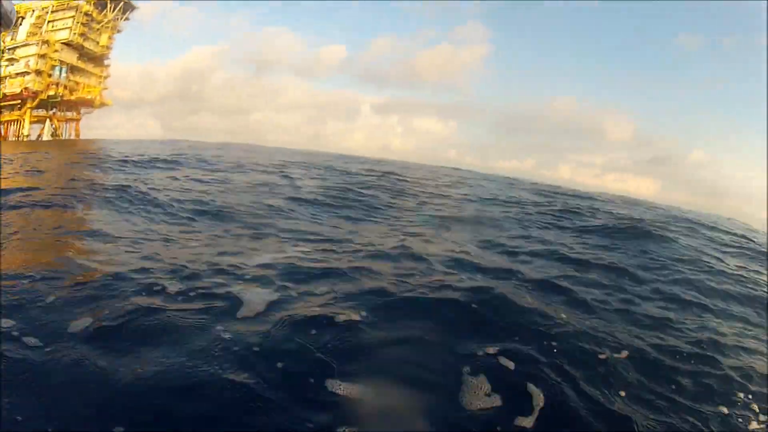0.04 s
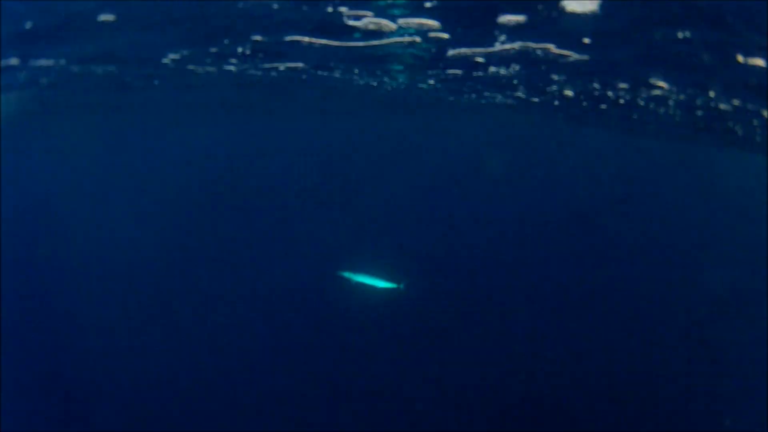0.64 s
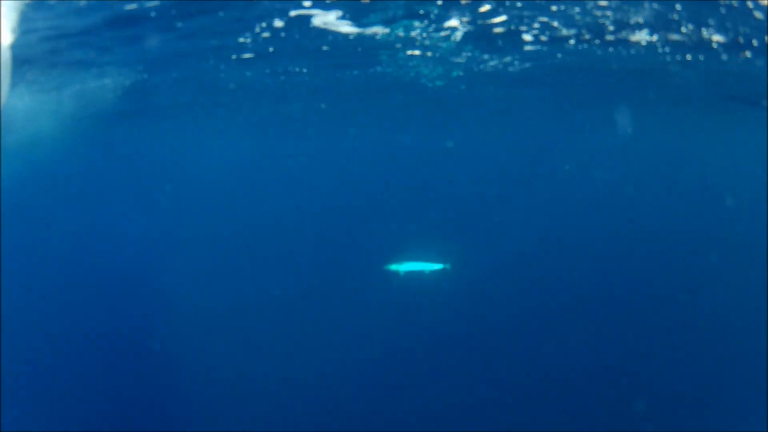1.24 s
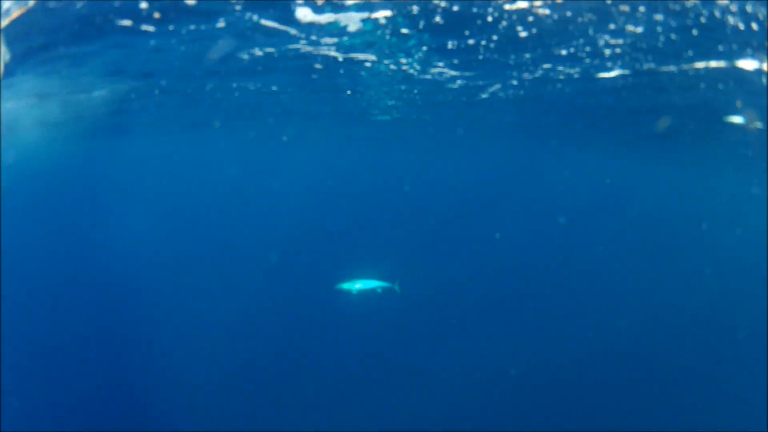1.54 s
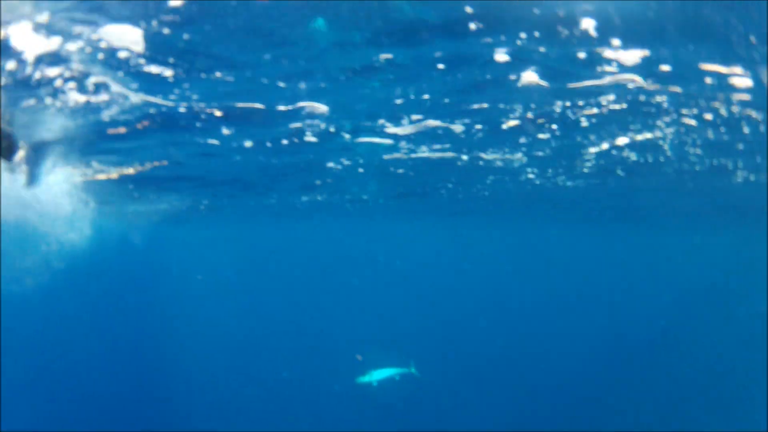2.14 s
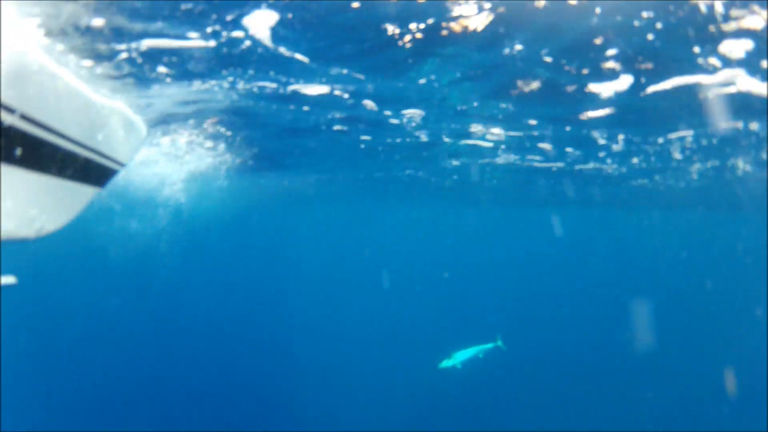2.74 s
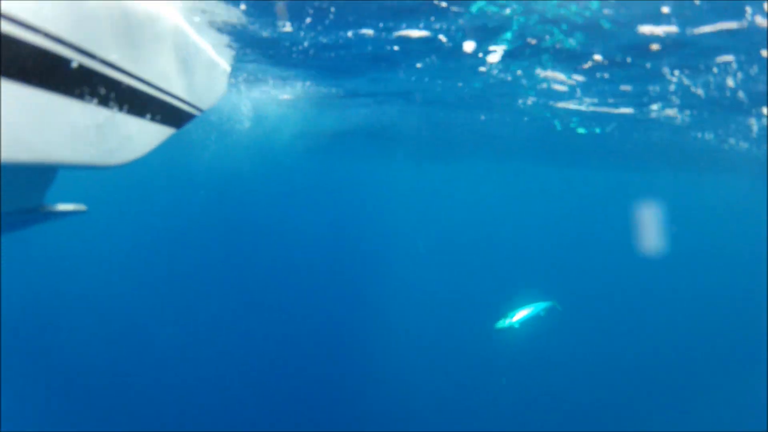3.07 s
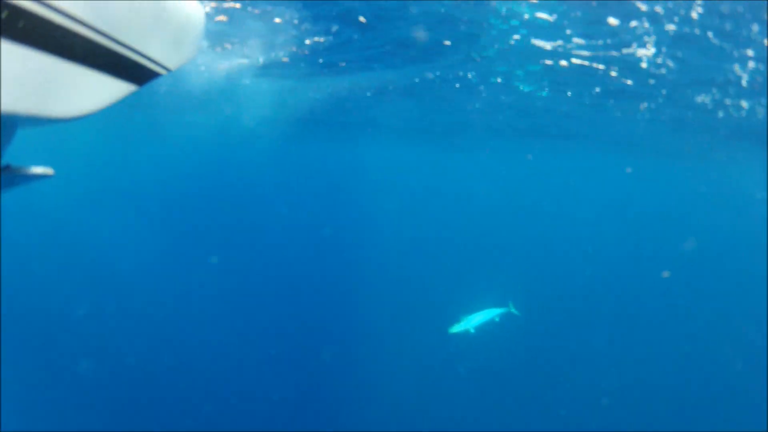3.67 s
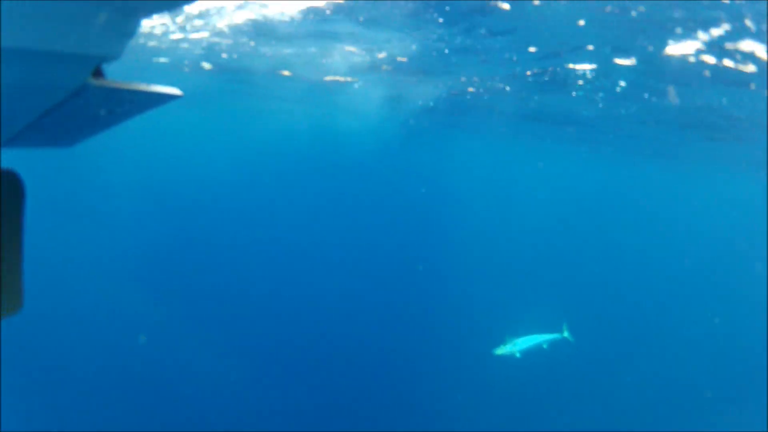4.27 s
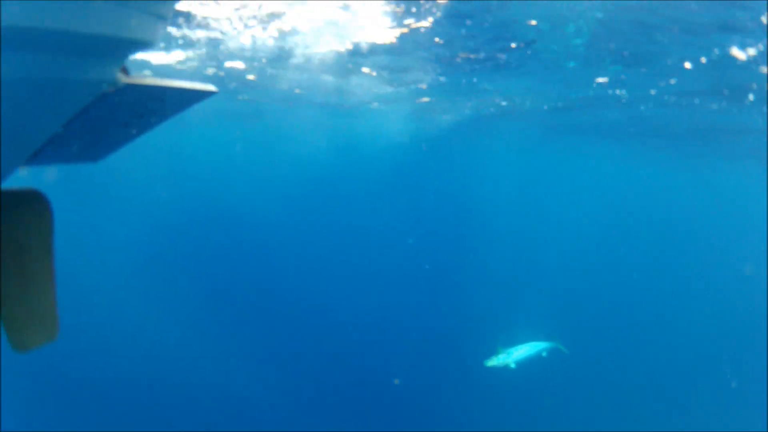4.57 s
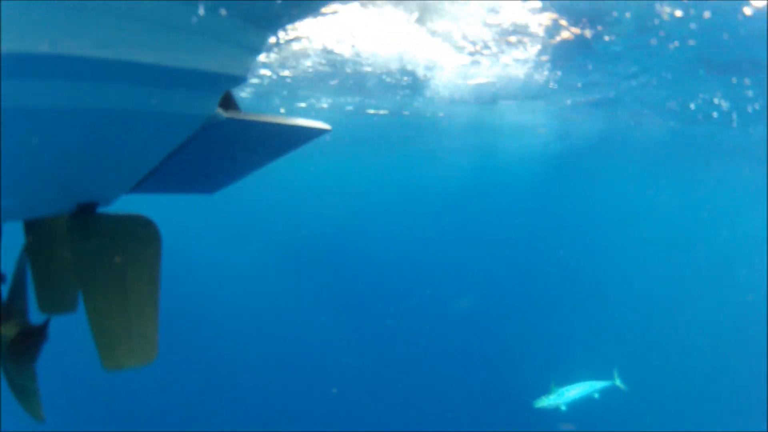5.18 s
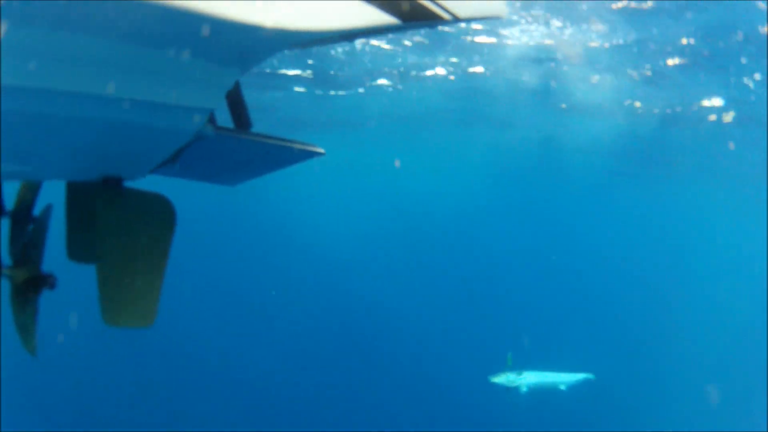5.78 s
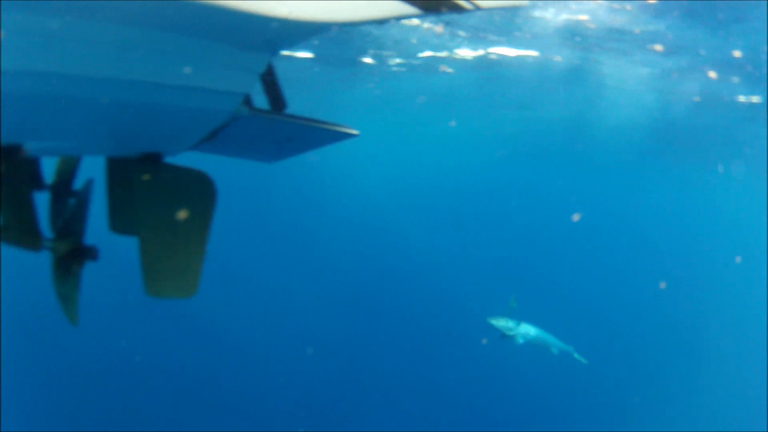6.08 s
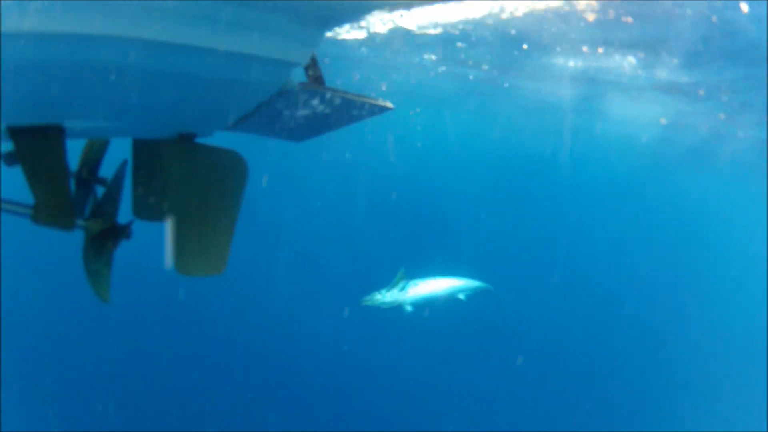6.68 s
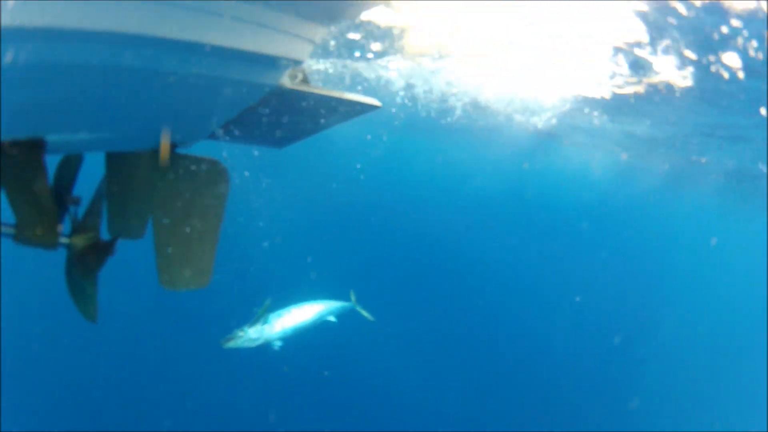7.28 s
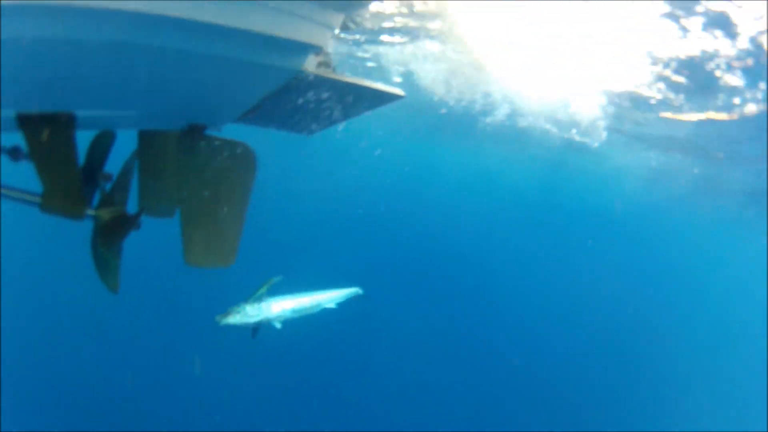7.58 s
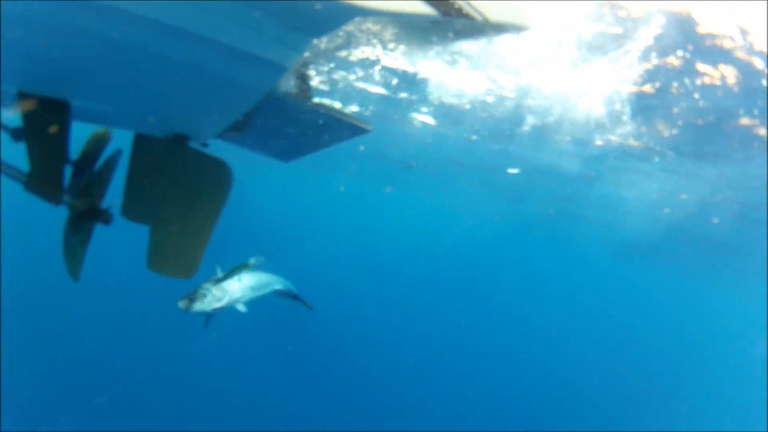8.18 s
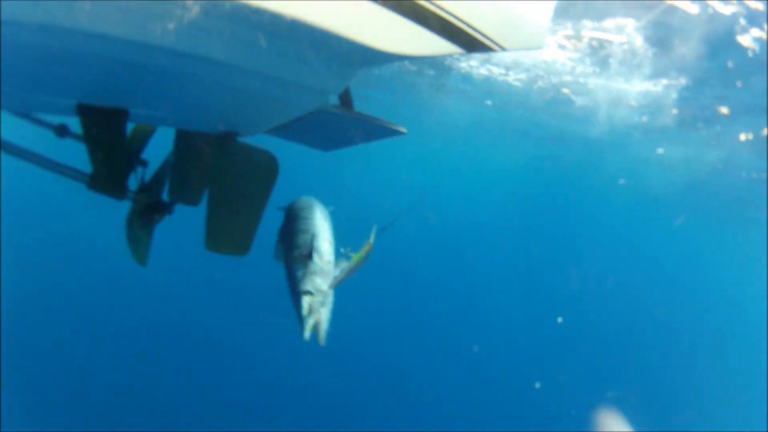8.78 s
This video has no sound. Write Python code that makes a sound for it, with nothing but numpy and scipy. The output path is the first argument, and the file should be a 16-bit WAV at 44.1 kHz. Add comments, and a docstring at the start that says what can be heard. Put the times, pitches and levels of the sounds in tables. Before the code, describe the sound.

A faint boat exhaust mutters in the air, then the microphone plunges into the sea with a sharp splash and a burst of gurgling bubbles. Underwater, two motors throb with a muffled low rumble, a swelling hull drone and a light machinery rattle. Propeller wash churns and fizzes throughout. Close by, bubbles gulp and plink and the waterproof housing ticks, growing busier near the end.

```python
"""In the sea beside a slowly moving fishing boat, heard from a camera housing plunged under the surface.
A faint exhaust mutter in the air gives way to two motors throbbing through the water, with hull drone
and machinery clatter. The propeller wash churns, rushes and fizzes, swelling as the stern comes near.
Up close, air bubbles gulp and plink, spray crackles and the housing ticks.
A coarse converter adds a thin sheen on top."""
import sys
import numpy as np
from scipy import signal
from scipy.fft import rfft, irfft, next_fast_len
from scipy.io import wavfile

SR = 44100
rng = np.random.default_rng(int(sys.argv[2]) if len(sys.argv) > 2 else 0)


def inscribe(sig):
    """Save sig as 16-bit PCM at rate SR to the path in sys.argv[1].

    A 1-D sig is mono; a 2-D sig holds one channel per row.
    Samples are clipped to [-1, 1] before scaling.
    """
    pcm = np.round(np.clip(np.atleast_2d(sig).T, -1, 1) * 32767)
    wavfile.write(sys.argv[1], SR, pcm.astype(np.int16))


N = 397782
TIME = np.arange(N) / SR


def from_db(db):
    """Decibels to gain."""
    return 10 ** (np.asarray(db) / 20)


def unit_rms(x):
    """Scale to rms 1."""
    return x / np.sqrt(np.mean(x ** 2) + 1e-20)


def automation(points):
    """Straight ramps between breakpoints, one value a sample."""
    return np.interp(TIME, *np.transpose(points))


def drift(rate_hz):
    """Slow random modulation, rms 1."""
    pole = np.exp(-80 * np.pi * rate_hz / SR)
    noise = rng.standard_normal(N // 40 + 2002)
    slow = signal.lfilter([1], [1, -2 * pole, pole * pole], noise)[2000:]
    return np.interp(np.arange(N) / 40, np.arange(len(slow)), unit_rms(slow))


def equalise(x, curve):
    """Shape a sound with an EQ curve; rms 1."""
    size = next_fast_len(N)
    hz, db = np.transpose(curve)
    bins_hz = np.maximum(np.arange(size // 2 + 1) * SR / size, 1)
    gain = from_db(np.interp(np.log(bins_hz), np.log(hz), db))
    return unit_rms(irfft(rfft(x, size) * gain, size)[:N])


def band(x, hz, width_hz):
    """Two matching resonators in series, unity gain at the peak."""
    r = np.exp(-np.pi * width_hz / SR)
    b = np.array([1, 0, -1]) * (1 - r * r) / 2
    a = [1, -2 * r * np.cos(2 * np.pi * hz / SR), r * r]
    return signal.lfilter(b, a, signal.lfilter(b, a, x + 1e-18) + 1e-18)


def grains(per_s, spread_db):
    """Random clicks of uneven size; rms 1."""
    sizes = from_db(spread_db * np.minimum(rng.exponential(1, N), 4)) * rng.choice([-1, 1], N)
    return unit_rms(sizes * (rng.random(N) < per_s / SR))


def pulsing(turns, per_turn, sharpness):
    """Smooth tremolo locked to the crankshaft, peaking at 1."""
    return np.exp(sharpness * (np.cos(2 * np.pi * per_turn * turns) - 1))


def knocks(turns, points):
    """A rough pattern that loops with every crankshaft turn."""
    return unit_rms(np.interp(turns % 1, np.arange(points) / points, rng.standard_normal(points)))


def add(out, start_s, sound):
    """Mix a sound in at its cue."""
    at = int(np.clip(round(start_s * SR), 0, N))
    out[at:at + len(sound)] += sound[:N - at]


# Tone of the boat through the air: freq_hz, gain_db
EXHAUST_EQ = [(41, -35), (70, -2.5), (167, -6.5), (414, -37), (674, -24), (775, -33), (906, -21),
              (1400, -41.5), (1760, -21), (2170, -33), (2860, -34), (4500, -34.5), (5850, -55),
              (9900, -120)]

def exhaust(turns, level_db=-49, dip_s=0.22, fade_db_per_s=69):
    """The exhaust mutters through the air and fades as the housing dips towards the surface."""
    mutter = knocks(turns, points=600) + rng.standard_normal(N) * pulsing(turns, 2.2, sharpness=0.28)
    fade = from_db(level_db - fade_db_per_s * np.maximum(TIME - dip_s, 0))
    return fade * equalise(mutter, EXHAUST_EQ)


# Tone of the fizz: freq_hz, gain_db
FIZZ_EQ = [(300, -11.5), (900, 6), (1500, 9.5), (2400, 4.5), (2900, -5), (3500, 1.5), (4300, -9.5),
           (5600, -17.5)]

def fizz(wash_db, plunge_s=0.52, hold_s=1.43, clear_db_per_s=17.5):
    """Fine bubbles crackle on the housing in clumps, fed by the wash and by air the plunge drags down."""
    cleared_db = clear_db_per_s * np.maximum(TIME - plunge_s - hold_s, 0)
    dragged_air = (TIME > plunge_s) * from_db(-54 - cleared_db)
    crackle = grains(per_s=1100, spread_db=3) * from_db(2.2 * drift(25))
    return np.hypot(dragged_air, from_db(wash_db)) * equalise(crackle, FIZZ_EQ)


def wash_layer(turns, eq, sharpness, lumps_db, growl_db):
    """Dense bubbles pulse with the propeller blades over the motor's growl."""
    surge = pulsing(turns, 4, sharpness) * from_db(lumps_db * drift(14))
    bubbling = equalise(grains(per_s=4000, spread_db=2) * surge, eq)
    growl = equalise(knocks(turns, points=400), eq)
    return unit_rms(bubbling + from_db(growl_db) * growl)


# Tone of the low churn and of the hollow rush: freq_hz, gain_db
CHURN_EQ = [(120, -22.5), (205, -5), (275, 3.5), (340, 1), (400, -1.5), (480, -11), (650, -25.5),
            (1200, -53.5)]
RUSH_EQ = [(300, -25.5), (450, -7), (530, -3.5), (585, 3.5), (640, -6), (700, -11), (780, -12), (900, -23),
           (1100, -33.5), (2000, -71.5)]
# Strength of the wash at the housing, around its average: time_s, level_db
WASH_FLOW = [(1.0, 0), (1.95, 2), (2.7, -5), (3.1, -1), (4.1, -0.5), (4.85, 3), (5.4, -1), (6.05, 2.5),
             (6.65, 1), (7.25, 2), (7.58, -3.5), (7.8, -1), (8.3, -1), (8.62, 2.5), (9.02, -1.5)]

def propeller_wash(turns, twin_turns, coupling_db):
    """One flow rides churn, rush and fizz together; each is ducked by its own amount in air."""
    flow_db = automation(WASH_FLOW)
    churn = wash_layer(turns, CHURN_EQ, sharpness=0.49, lumps_db=3.5, growl_db=-4.5)
    churn *= from_db(-36 + 1.17 * flow_db + 1.3 * coupling_db)
    rush = wash_layer(twin_turns, RUSH_EQ, sharpness=0.15, lumps_db=2.06, growl_db=-10)
    rush *= from_db(-34 + flow_db + 1.74 * coupling_db)
    return churn + rush + fizz(wash_db=-58 + 0.8 * flow_db + 0.28 * coupling_db)


def small_bubble(hz, cycles, rise):
    """An air pocket rings as a dying sine whose pitch creeps up."""
    t60 = cycles / hz
    t = np.arange(int(max(t60, 0.005) * 1.2 * SR)) / SR
    envelope = from_db(-60 * t / t60) * (1 - np.exp(-t * hz))
    return envelope * np.sin(2 * np.pi * hz * t * (1 + rise * t / t60))


# Drifting clouds of small bubbles: start_s, end_s, bubble_level_db, burst_level_db
BUBBLE_CLOUDS = [(0.557, 1.095, -23.5, -51), (1.15, 3.399, -33, -42), (3.388, 7.597, -49, -40),
                 (7.651, 9.001, -31.5, -34)]

def bubble_clouds(per_cloud=90, spread_db=10):
    """Small bubbles of all sizes drift past, the smallest highest and faintest."""
    out = np.zeros(N)
    for start, end, db, _ in BUBBLE_CLOUDS:
        for when, smallness, softness in rng.random((per_cloud, 3)):
            gain = from_db(db - spread_db * softness - 11 * smallness)
            plink = small_bubble(hz=800 * 4.3 ** smallness, cycles=46, rise=0.091)
            add(out, start + when * (end - start), gain * plink)
    return out


def cloud_bursts(per_cloud=12, spread_db=10.5, decay_s=0.006, hz=2330):
    """Cues for tiny splashes scattered through each cloud."""
    return [(start + when * (end - start), db - spread_db * softness, decay_s, hz * 2 ** (height - 0.5))
            for start, end, _, db in BUBBLE_CLOUDS
            for when, softness, height in rng.random((per_cloud, 3))]


# Bursts of broken air and spray at the housing: start_s, level_db, decay_s, pitch_hz
SPLASH_CUES = [(0.038, -41.5, 0.0097, 2420), (0.525, -41.5, 0.015, 1990), (0.536, -16, 0.012, 1790),
               (0.552, -2.5, 0.0047, 2450), (0.561, -27, 0.044, 1860), (.632, -18.5, 0.0094, 1550),
               (.665, -28, 0.0078, 1570), (0.691, -18.5, 0.0082, 2550), (0.713, -24, 0.022, 1820),
               (0.858, -28, 0.0059, 2340), (.95, -41, 0.024, 2640), (1.21, -36, 0.026, 2700),
               (1.825, -31, 0.017, 2030), (1.86, -51, 0.068, 3000), (2.405, -29, 0.01, 2000),
               (3.189, -30.5, 0.01, 1450), (4.755, -32, 0.019, 1940), (6.17, -38.5, 0.041, 920),
               (6.996, -27.5, 0.0072, 1550), (7.018, -31, 0.0044, 2170), (7.038, -27.5, 0.0036, 1800),
               (7.702, -28, 0.0047, 2700), (7.733, -30, 0.0058, 2270), (7.9, -33, 0.019, 1060),
               (7.942, -26, 0.0029, 2980), (8.07, -26.5, 0.0042, 1720), (8.145, -32.5, 0.011, 1380),
               (8.473, -25, 0.0045, 1878), (8.495, -30, 0.005, 2964), (8.56, -27.5, 0.0077, 2300),
               (8.719, -37, 0.016, 2430), (8.764, -25, 0.0049, 2170), (8.99, -29, 0.016, 2480)]

def splashes(crackle_db=-8, plink_db=4, attack_s=0.0012, plinks=5):
    """Each slap of water is a dying crackle that sheds a handful of tiny ringing bubbles."""
    out, t = np.zeros(N), TIME[:SR // 3]
    for start, db, decay, hz in list(SPLASH_CUES) + cloud_bursts():
        crackle = unit_rms(band(rng.standard_normal(len(t)), hz, width_hz=1390))
        envelope = np.exp(-t / decay) * (1 - np.exp(-t / attack_s))
        add(out, start, from_db(db + crackle_db) * envelope * crackle)
        for age, detune in rng.uniform([0, -1], [1.5, 1], (plinks, 2)):
            plink = small_bubble(hz * 1.34 ** detune, cycles=18.7, rise=0.023)
            add(out, start + age * decay, from_db(db + plink_db) * np.exp(-age / 2) * plink)
    return out


# Sharp contacts on the housing: start_s, level_db
TICK_CUES = [(0.552, -5), (0.614, -27), (0.6881, -18), (0.764, -32), (2.7489, -10), (4.753, -42),
             (5.32, -35), (6.8109, -40), (7.039, -29), (7.9427, -33), (8.0716, -39), (8.496, -28),
             (8.6418, -38), (8.8961, -36)]
# Ring of the housing: pitch_hz, level_db, t60_s
HOUSING_MODES = [(2010, -2, 0.011), (2530, -14, 0.017), (3630, -4, 0.011), (4090, -8, 0.015),
                 (4710, -7.5, 0.014), (4940, -6.5, 0.013)]

def housing_ticks(trim_db=-3.5, scatter_db=2):
    """Sharp contacts ring the housing briefly, each with its own balance of modes."""
    out, t = np.zeros(N), TIME[:SR // 20]
    hz, mode_db, t60 = np.transpose(HOUSING_MODES)[:, :, None]
    for start, db in TICK_CUES:
        balance_db = mode_db + scatter_db * rng.standard_normal(hz.shape)
        modes = from_db(balance_db - 60 * t / t60) * np.sin(2 * np.pi * hz * t)
        add(out, start, from_db(db + trim_db) * modes.sum(axis=0))
    return out


# Ring of the hull's panels: pitch_hz, width_hz, level_db
HULL_PANELS = [(1208, 85, 2), (1560, 230, -6), (1838, 94, -3.5), (2026, 170, 3), (2211, 86, -1),
               (2442, 330, -10.5), (3450, 370, -18.5), (4840, 250, -49.5)]
# Clatter fader, highest as the stern passes: time_s, level_db
CLATTER_FADER = [(1.15, -55), (2.0, -54.5), (3.2, -50.5), (4.1, -47.5), (4.85, -43.5), (5.45, -48.5),
                 (7.5, -52), (8.6, -47.5)]

def machinery_clatter(turns, looped_db=-6, uneven_db=2.2):
    """Each firing shakes the machinery, and the hull passes the rattle on in narrow bands."""
    contacts = grains(per_s=4600, spread_db=3) + from_db(looped_db) * knocks(turns, points=2800)
    shaking = contacts * pulsing(turns, 2, sharpness=0.44) * from_db(uneven_db * drift(27))
    panels = sum((-1) ** k * from_db(db) * band(shaking, hz, width)
                 for k, (hz, width, db) in enumerate(HULL_PANELS))
    return from_db(automation(CLATTER_FADER)) * unit_rms(panels)


# Hull drone fader: time_s, level_db
DRONE_FADER = [(1.2, -41.5), (2.2, -25), (2.749, -35), (3.05, -29), (3.301, -42), (3.85, -45), (4.7, -27),
               (6.2, -34.5), (6.501, -39), (7.3, -39.5), (7.95, -30.5), (9.02, -40.5)]

def hull_drone(turns, resonance_hz=156.5, half_width_hz=24.7, roughness=0.41, trim_db=-1.5):
    """Uneven cylinders make half orders, which the hull picks out around its resonance."""
    drone = 0
    for order in np.arange(16, 25) / 2:
        nominal_hz = order * 15.6
        gain = 1 / (1 + ((nominal_hz - resonance_hz) / half_width_hz) ** 2)
        flutter = 1 + roughness * drift(6.2)
        drone += gain * flutter * np.sin(2 * np.pi * (order * turns + rng.random()))
    return from_db(automation(DRONE_FADER) + trim_db) * unit_rms(drone)


# Sub thud fader: time_s, level_db
THUD_FADER = [(0.95, -40), (1.4, -32.5), (2.75, -43.5), (3.8, -38), (4.22, -26.5), (4.46, -49), (4.65, -45),
              (4.8, -35), (5.4, -38), (5.55, -45), (6.65, -34), (7.2, -54), (8.3, -52), (8.9, -42)]

def firing_thud(turns, trim_db=4.5):
    """A deep sine at the firing rate, two cycles a turn."""
    return from_db(automation(THUD_FADER) + trim_db) * np.sin(4 * np.pi * turns)


# Motor harmonics: crankshaft_multiple, level_db
MOTOR_HARMONICS = [(3, -7.5), (4, 1.5), (5, -6), (6, -8.5), (7, -10.5), (8, -17), (9, -21.5), (10, -21),
                   (11, -31), (17, -26), (21, -26)]

def motor(turns, waver_db, jitter_rad):
    """Clean tones on the crankshaft orders; each wavers on its way through the moving water."""
    tones = 0
    for order, db in MOTOR_HARMONICS:
        phase = 2 * np.pi * (order * turns + rng.random()) + jitter_rad * drift(1.3)
        tones += from_db(db + waver_db * drift(1.45)) * np.sin(phase)
    return unit_rms(tones)


# Tone of the rumble under the motors: freq_hz, gain_db
RUMBLE_EQ = [(10, -22.5), (24, -28), (37, -9.5), (55, 12.5), (75, 8.5), (110, 8), (170, -10.5), (220, -10),
             (400, -56.5)]
# Level of the bass throb, with one low water thump near 7.9 s: time_s, level_db
THROB_FADER = [(0.92, -24.5), (1.03, -25.5), (1.08, -20), (1.17, -24), (1.44, -13.5), (1.96, -22),
               (2.02, -17.5), (2.52, -22), (3.02, -16.5), (3.24, -18), (3.29, -25), (3.97, -22),
               (3.99, -28.5), (4.62, -19), (4.66, -26.5), (5.45, -28.5), (5.61, -19), (5.93, -25.5),
               (6.36, -23), (6.69, -28.5), (6.99, -22.5), (7.17, -31.5), (7.53, -37), (7.87, -28),
               (7.91, -17), (7.96, -29.5), (8.27, -27), (8.43, -34), (8.93, -30), (9.02, -37)]

def motor_throb(turns, twin_turns, sway_db=1.13):
    """Two motors beat against each other over a bed of rumble, swaying in the moving water."""
    lead = from_db(-0.07) * motor(turns, waver_db=1, jitter_rad=0.18)
    twin = from_db(-8) * motor(twin_turns, waver_db=5.5, jitter_rad=0.69)
    rumble = from_db(-10) * equalise(rng.standard_normal(N), RUMBLE_EQ)
    return from_db(automation(THROB_FADER) + sway_db * drift(4.5)) * (lead + twin + rumble)


# A run of hollow gulps: start_s, end_s, level_db, pitch_hz
GULP_RUN = (7, 7.42, -15.5, 541.5)

def gulps(count=9, spread_db=6):
    """Bubble cues for air that a swell pushes under the stern, where it breaks up."""
    start, end, db, hz = GULP_RUN
    return [(start + when * (end - start), db - spread_db * softness, hz * 1.35 ** (height - 0.5))
            for when, softness, height in rng.random((count, 3))]


# Single bubbles at the housing: start_s, level_db, pitch_hz
BUBBLE_CUES = [(0.55, -9, 158.6), (0.5542, -1.5, 1130), (0.5628, -4, 1540), (0.607, -12.5, 1780),
               (0.633, -7, 622), (0.641, 5.5, 360), (0.694, -14, 557), (0.716, -2.5, 453),
               (0.8495, -18, 564), (0.858, -22, 2470), (0.888, -11.5, 2030), (0.888, -6, 1450),
               (0.922, -9.5, 960), (0.9395, -27, 1015), (0.9435, -28, 2450), (0.9755, -25, 1900),
               (0.9955, -28, 2710), (1.005, -3.5, 506), (1.0098, -10.5, 682), (1.042, -8, 573),
               (1.062, -4, 508), (1.09, -26, 1840), (1.705, -16.5, 555), (1.829, -11.5, 470),
               (2.4118, -27, 983), (2.7494, -19.5, 1680), (3.069, -30, 3550), (3.1314, -19, 540),
               (3.171, -29, 1230), (3.393, -21.5, 898), (4.577, -27, 1214), (4.892, -20.5, 392),
               (5.497, -29, 1530), (5.549, -15, 571), (6.021, -18, 301), (6.8846, -7.5, 461),
               (6.997, -26, 1430), (7.0955, -15, 573), (7.253, -6, 506), (7.734, -6, 816),
               (7.736, -7.5, 976), (7.764, -16.5, 503), (7.988, -14, 502), (7.989, -18.5, 1289),
               (8.147, -22, 2060), (8.487, -18, 1060), (8.488, -9, 1940), (8.5105, 0, 1960),
               (8.5189, -8, 2300), (8.562, -16.5, 2620), (8.628, -15.5, 555), (8.632, -21, 1463),
               (8.678, -35, 3230), (8.693, -31, 3520), (8.719, -28, 2530), (8.734, -27, 2000),
               (8.745, -28.5, 3400), (8.77, -20, 1690), (8.979, -7.5, 598)]

def close_bubbles(rise=0.023, tail_db=-21, tail_stretch=8.8, kick_cycles=2.85):
    """Each bubble kicks as it pinches off, swings wide and dies fast, leaving a fainter long ring."""
    out, t = np.zeros(N), TIME[:SR // 4]
    for start, db, hz in list(BUBBLE_CUES) + gulps():
        # Smaller bubbles ring for more cycles; wider swings are damped harder.
        t60 = 10.6 * (hz / 1000) ** 0.19 * from_db(-0.44 * db) / hz
        attack = (1 - np.exp(-1.48 * t * hz)) ** 2
        decay = from_db(-60 * t / t60) + from_db(tail_db - 60 * t / (t60 * tail_stretch))
        bend = 1 + rise * (1 - np.exp(-t / t60))
        ring = attack * decay * np.sin(2 * np.pi * hz * t * bend)
        kick_db = -3 - 5 * np.log2(hz / 1000)  # smaller bubbles kick less
        kick_envelope = from_db(kick_db - 60 * t * hz / kick_cycles) * (1 - np.exp(-2 * t * hz))
        kick = kick_envelope * np.sin(2 * np.pi * hz * t)
        add(out, start, from_db(db) * (ring + kick))
    return out


# Crankshaft speed as the load swings with the swell: time_s, turns_per_s
CRANK_SPEED = [(0, 15.6), (1.7, 16.2), (2.2, 15.44), (2.7, 16.4), (3.5, 14.07), (4.15, 15.7), (4.8, 14.34),
               (5.5, 16.8), (6.3, 16.3), (6.9, 15.66), (7.5, 16.1), (8.0, 15.3), (8.6, 15.2), (9.02, 14.3)]
# How much of the boat arrives through the water, little until the housing is under: time_s, gain_db
WATER_COUPLING = [(0.77, -23), (0.92, 0)]

def scene():
    """Mono mix: the boat and its wash open up with the plunge, behind the close water sounds."""
    turns = np.cumsum(automation(CRANK_SPEED)) / SR
    twin_turns = 0.975 * turns + 0.04594 * drift(0.4225)  # the second motor runs a little slower
    coupling_db = automation(WATER_COUPLING)
    low_end = motor_throb(turns, twin_turns) + firing_thud(turns) + hull_drone(twin_turns)
    boat = from_db(coupling_db) * low_end + from_db(0.83 * coupling_db - 0.24) * machinery_clatter(turns)
    bed = propeller_wash(turns, twin_turns, coupling_db) + bubble_clouds() + exhaust(turns)
    close = close_bubbles() + housing_ticks() + splashes()
    return (bed + boat + close)[None]


def record(dry, converter_hz=12000, ceiling=0.54, cutoff_hz=15300):
    """A sample-and-hold converter mirrors the sound faintly about its rate; peaks clip softly."""
    coarse = signal.resample_poly(dry, converter_hz, SR, axis=-1)
    held = signal.resample_poly(np.repeat(coarse, 4, axis=-1), SR, 4 * converter_hz, axis=-1)[:, :N]
    clipped = held / (1 + (held / ceiling) ** 8) ** (1 / 8)
    return signal.sosfilt(signal.ellip(10, 0.2, 80, cutoff_hz, fs=SR, output="sos"), clipped)


dry = scene()
out = record(dry)
inscribe(out)
```